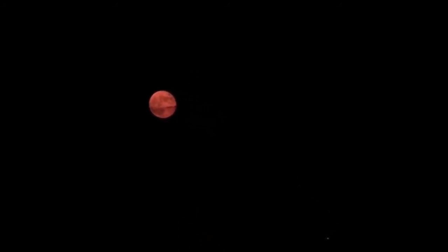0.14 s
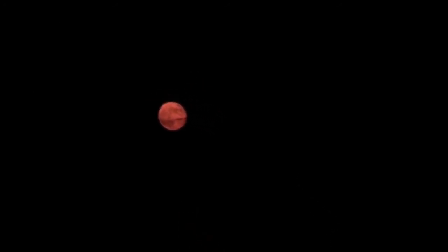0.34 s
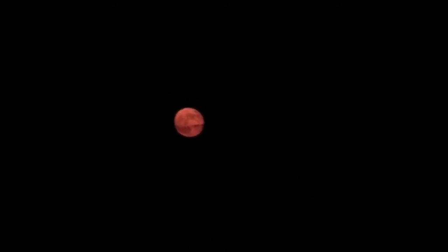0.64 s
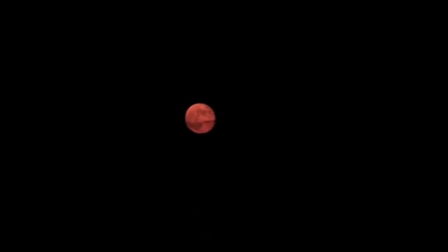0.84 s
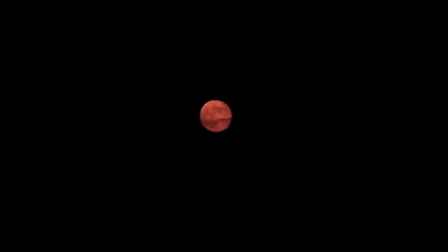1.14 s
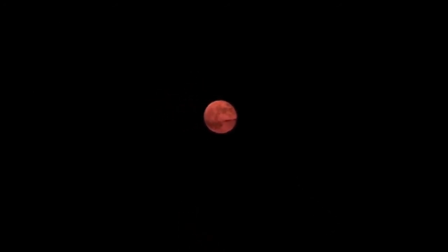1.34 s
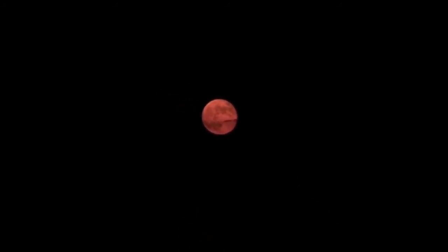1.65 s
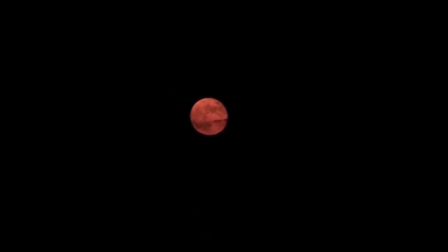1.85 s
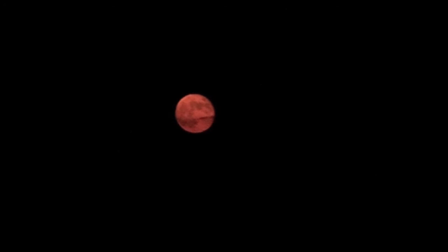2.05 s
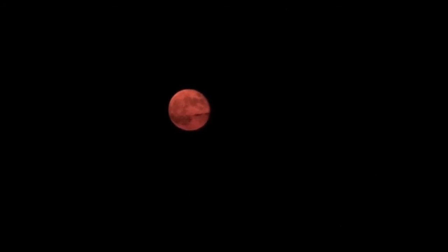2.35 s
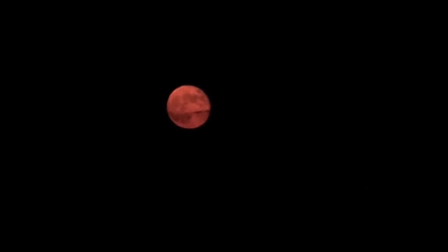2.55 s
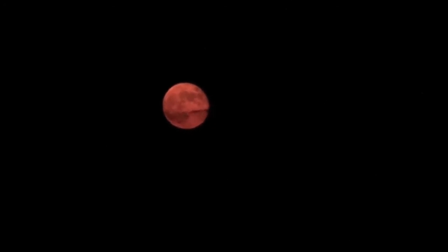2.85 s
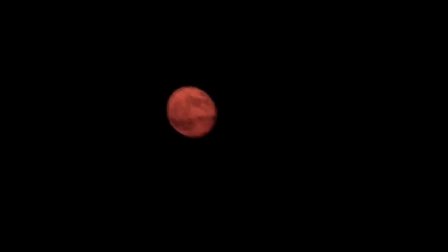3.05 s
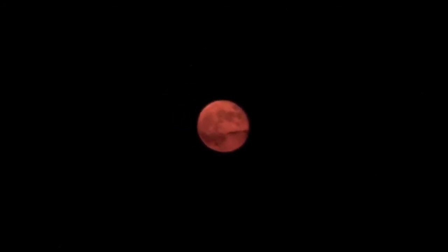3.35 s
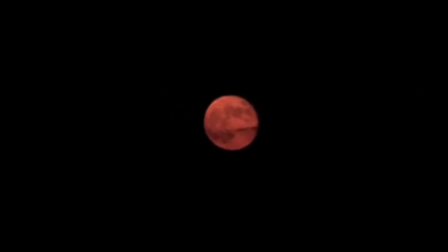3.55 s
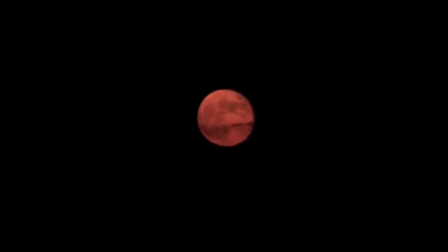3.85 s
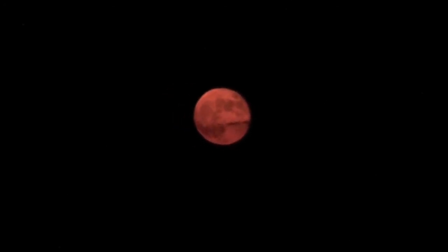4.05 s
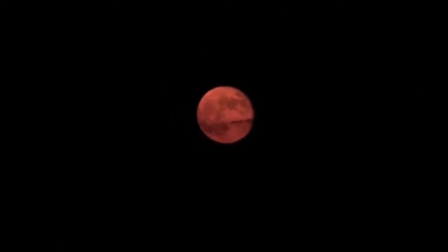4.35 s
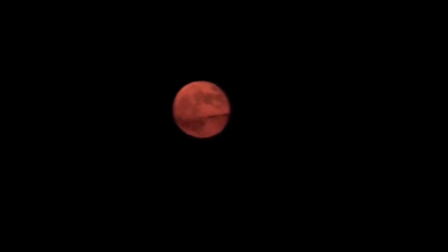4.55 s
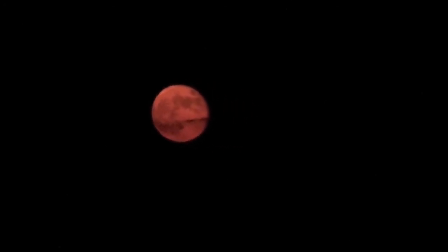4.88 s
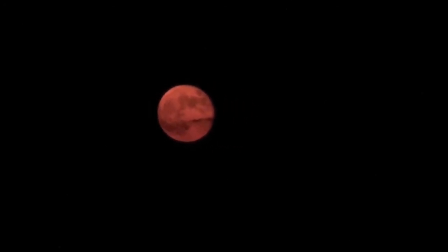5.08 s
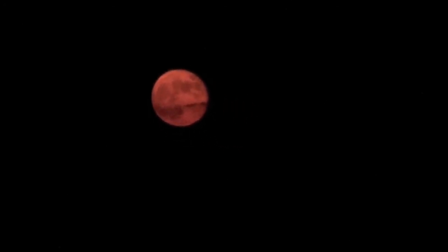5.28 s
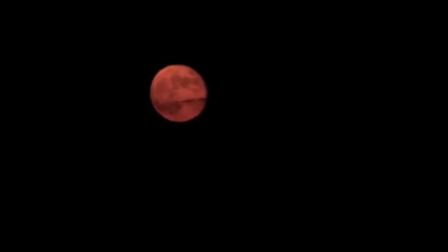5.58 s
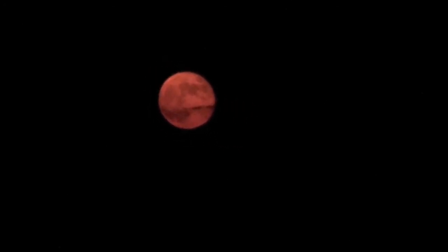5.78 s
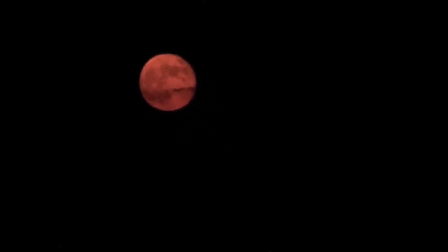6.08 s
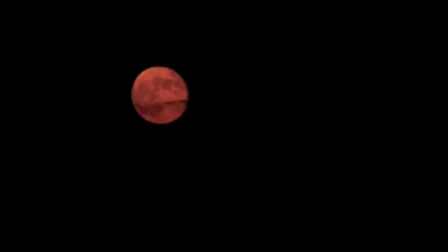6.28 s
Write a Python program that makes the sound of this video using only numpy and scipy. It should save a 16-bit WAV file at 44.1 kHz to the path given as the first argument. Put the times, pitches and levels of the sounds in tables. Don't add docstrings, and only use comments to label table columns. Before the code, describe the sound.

Outdoors on a quiet night, distant frogs trill in swelling bands over still water, with a nearer frog on the right giving quick runs of rising notes and occasional hoarse croaks ahead. A low distant engine hum wavers under soft air and hiss. Near the end, two much louder, dry plastic clicks snap right at the microphone.

```python
import sys
import numpy as np
from scipy import signal
from scipy.io import wavfile
from scipy.ndimage import uniform_filter1d

SR = 44100
rng = np.random.default_rng(int(sys.argv[2]) if len(sys.argv) > 2 else 0)


def voltage_ratio(level):
    return 10 ** (np.asarray(level, float) / 20)


def wrap_up_sound(samples):
    columns = np.atleast_2d(samples).T
    tamed = np.clip(columns, -1, 1)
    steps = np.round(tamed * 32767).astype(np.int16)
    wavfile.write(sys.argv[1], SR, steps)


N = 283122


def evened(x):
    return x / np.sqrt(np.mean(x ** 2) + 1e-20)


def read(points, hz):
    f, value = np.transpose(points)
    return np.interp(np.log(hz + 1), np.log(f + 1), value)


def columns(rows):
    s, *rest = np.transpose(rows)
    return [np.interp(np.arange(N) / SR, s, column) for column in rest]


def bumps(rows):
    t = np.arange(N) / SR
    return sum(high * np.cos(np.pi / 2 * np.clip((t - s) / half, -1, 1)) ** 2 for s, high, half in rows)


def drift(top_hz):
    t = np.arange(0, N / SR + .02, .005)
    slow = sum(np.sin(2 * np.pi * (f * t + rng.random())) for f in np.geomspace(top_hz / 20, top_hz, 20))
    return np.interp(np.arange(N) / SR, t, evened(slow))


def add(mix, s, sound):
    part = mix[..., max(round(s * SR), 0):][..., :sound.shape[-1]]
    part += sound[..., :part.shape[-1]]


def panned(x, db):
    return x * voltage_ratio(np.array([[db / 2], [-db / 2]]))


def highpass(x, order, hz):
    return signal.sosfilt(signal.butter(order, hz, "high", fs=SR, output="sos"), x)


def echoes(x, t60, onset):
    t = np.arange(SR // 3) / SR
    tail = rng.standard_normal((2, len(t))) * voltage_ratio(-60 * t / t60) * np.minimum(t / onset, 1)
    return signal.fftconvolve(x, tail / np.linalg.norm(tail[0]), axes=1)[:, :N]


def frogs():
    # (middle [s], rise [dB], half length [s])
    high_bouts = [(0, 7.5, 0.71), (1, 3.5, .4), (1.5, 2.2, 0.45), (2.25, 6.8, 0.58), (3.18, 9.5, 0.48),
                  (3.55, 5, 0.27), (4.62, 5.1, 0.45), (5.53, 9.4, 0.4), (6, 7.1, .45)]
    # (middle [s], rise [dB], half length [s])
    low_bouts = [(0, 5, 0.68), (.9, 4, 0.46), (1.43, 3.5, 0.58), (2.3, 3.5, 0.85), (2.92, 6, .4),
                 (3.68, 6, 0.42), (4.35, 3.5, 0.2), (4.7, 4.7, 0.5), (5.55, 5.1, 0.28), (6.24, 4.1, 0.55)]
    near, lone = caller(), croaks()
    calling = uniform_filter1d(1. * (near != 0), size=SR // 10)
    hush_db = -5 * np.minimum(calling * 2, 1)
    high_db = -58.5 + bumps(high_bouts) + hush_db - 4.0
    low_db = -62.5 + bumps(low_bouts) - 1.5
    high = voices(high_db, 1983, 155.4, 298, 0.0195, 30, 1.1, -23.5, count=30)
    low = voices(low_db, 1184.0, 75, 112, 0.019, 16, 4.7, -28, count=12)
    right = panned(high, -5.0) + panned(near, -5.5)
    ahead = panned(low, -0.65) + panned(lone, -1.0)
    return right + ahead + echoes(voltage_ratio(-8.5) * right + voltage_ratio(-20) * ahead, 0.13, 0.046)


def caller():
    # (first note [s], end [s], gap [s], peak level [dB], middle pitch [Hz])
    runs = [
        (.0365, .32, .0436, -48.5, 1895),
        (1.4565, 1.7, .0445, -50, 1880),
        (2.041, 2.31, .041, -54, 1950),
        (5.214, 5.45, .0428, -47.5, 1930),
    ]
    warm_up_db, warm_up_s = 3, .05
    uneven_db, uneven_hz = .7, 15
    near = np.zeros(N)
    for first, end, gap, db, hz in runs:
        chance = rng.standard_normal((12, 2))
        for s, (loud, high) in zip(np.arange(first, end, gap), chance):
            middle = hz + uneven_hz * high
            note_db = db + 3 - warm_up_db * np.exp((first - s) / warm_up_s) + uneven_db * loud
            add(near, s - .008, voltage_ratio(note_db) * chirp(middle - 230, middle + 300, .024, -22))
    return near


def chirp(from_hz, to_hz, length, overtone_db=-60):
    hz = np.linspace(from_hz, to_hz, max(round(length * SR), 8))
    turn = 2 * np.pi * np.cumsum(hz) / SR
    return (np.sin(turn) + voltage_ratio(overtone_db) * np.sin(2 * turn)) * np.hanning(len(hz))


def voices(level_db, hz, spread_hz, glide_hz, length, per_s, uneven_db, overtone_db, count):
    out = np.zeros(N)
    for pitch, (pace, start) in zip(np.linspace(-1, 1, count), rng.uniform(-1, 1, (count, 2))):
        cycles = np.arange(N) * per_s * (1 + .15 * pace) / SR + start
        beats = np.flatnonzero(np.diff(np.floor(cycles)))
        middle = hz + spread_hz * pitch
        note = chirp(middle - glide_hz / 2, middle + glide_hz / 2, length, overtone_db)
        for at, db in zip(beats, uneven_db * drift(2.7)[beats]):
            add(out, at / SR, voltage_ratio(db) * note)
    slow = np.sqrt(uniform_filter1d(out ** 2, size=SR // 4) + 1e-12)
    return voltage_ratio(level_db) * out / slow


def croaks():
    # (time [s], peak level [dB], top pitch [Hz], length [s])
    arches = [
        (1.82, -48, 977, 0.146),
        (3.076, -52, 916, 0.119),
        (3.527, -53.5, 1006, 0.16),
    ]
    # (time [s], peak level [dB], start pitch [Hz], end pitch [Hz], length [s])
    slides = [
        (.101, -49.5, 787, 940, 0.085),
        (0.191, -49, 1013, 1150, .06),
        (1.374, -52, 763, 1003, 0.15),
        (3.269, -60, 922, 1130, 0.23),
        (3.432, -51, 1230, 1190, 0.039),
        (4.447, -51, 945, 1065, 0.104),
        (4.54, -51, 1245, 1140, 0.056),
    ]
    out = np.zeros(N)
    for s, db, hz, length in arches:
        add(out, s, voltage_ratio(db) * croak(.82 * hz, hz, .82 * hz, length))
    for s, db, from_hz, to_hz, length in slides:
        add(out, s, voltage_ratio(db) * croak(from_hz, (from_hz + to_hz) / 2, to_hz, length))
    return out


def croak(start_hz, top_hz, end_hz, length):
    u = np.linspace(0, 1, round(length * SR))
    hz = np.polyval(np.polyfit([0, .5, 1], [start_hz, top_hz, end_hz], 2), u)
    shaky = evened(uniform_filter1d(rng.standard_normal(SR // 4), size=250))[:len(u)]
    throb = 1 - 0.37 * (1 + np.cos(2 * np.pi * 27 * length * u))
    return np.sin(2 * np.pi * np.cumsum(hz + 55 * shaky) / SR) * throb * signal.windows.tukey(len(u), .4)


def control():
    # (time [s], peak level [dB])
    press_blows = [
        (5.5066, -11.5),
        (5.5080, -46),
    ]
    # (frequency [Hz], level [dB], t60 [s])
    press_modes = [(600, -10, 0.075), (1050, 2, 0.032), (1690, 2, 0.021), (3120, 13, 0.006),
                   (3900, -7.5, 0.028), (4150, 6.5, 0.0097), (5800, -11, 0.014), (7200, -5.5, 0.0086),
                   (9500, -2, 0.0063), (11900, -13, 0.0048)]
    # (time [s], peak level [dB])
    release_blows = [
        (5.6038, -16),
        (5.6053, -7),
        (5.6085, -26),
        (5.6140, -32),
        (5.6210, -36),
    ]
    # (frequency [Hz], level [dB], t60 [s])
    release_modes = [(1103, -14, 0.058), (1647, -16, 0.09), (1700, -7, 0.023), (2000, -14, 0.05),
                     (2070, -8, 0.017), (2470, -21.5, 0.068), (2520, -14, .017), (3140, -5, .015),
                     (3814, 1.5, 0.0099), (4100, -20, 0.014), (5170, -10.5, 0.013), (6050, -11, 0.01)]
    press = press_blows, press_modes, -8, 300
    release = release_blows, release_modes, -5, 950
    out = np.zeros((2, N))
    for blows, modes, bright_db, low_hz in (press, release):
        for s, db in blows:
            body = highpass(ring(modes, bright_db), 5, low_hz)
            add(out, s, panned(voltage_ratio(db) * body, -0.8))
    add_creaks(out)
    out = highpass(out, 4, 480)
    dull = signal.sosfilt(signal.butter(2, [1200, 3300], "band", fs=SR, output="sos"), out)
    near = voltage_ratio(-16) * echoes(out, .03, .002)
    return out + near + voltage_ratio(-30) * echoes(dull, 0.12, 0.0087)


def add_creaks(out):
    # (time [s], peak level [dB], ring [Hz], left minus right [dB], small modes [dB])
    creaks = [(2.816, -38.5, 5200, 1, -3), (3.809, -35, 1570, 1, -13), (4.635, -42.5, 1300, 1, -1),
              (5.4938, -29, 1740, 4, 2), (5.542, -39, 1900, -2, -5), (5.568, -35, 1290, -1.5, -11),
              (5.578, -27.5, 1700, 1, -9), (5.5888, -27, 1400, 2, -8), (5.593, -31, 1700, -1, -12),
              (5.597, -37, 1840, 4, -3), (5.598, -24, 1980, 4, -4)]
    # (time [s], peak level [dB], lowest frequency [Hz])
    ticks = [
        (2.408, -46, 6000),
        (2.67, -48, 8000),
        (3.809, -44, 5300),
    ]
    for s, db, hz, pan_db, bright_db in creaks:
        soft = signal.lfilter(*signal.butter(2, 11000, fs=SR), ring([(hz, 0, .018)], bright_db))
        add(out, s, panned(voltage_ratio(db) * soft, pan_db))
    for s, db, hz in ticks:
        thin = highpass(ring([]), 4, hz)
        add(out, s, voltage_ratio(db) * thin / abs(thin).max())


def ring(modes, bright_db=0.5):
    # (frequency [Hz], level [dB])
    casing = [(900, -8), (1300, -5.5), (3000, -3.5), (4500, -11.5), (6000, -18), (9000, -17),
              (15000, -21.5)]
    # (frequency [Hz], t60 [s])
    casing_t60 = [(700, 0.042), (2500, 0.015), (6000, 0.014), (15000, 0.0074)]
    t = np.arange(SR // 12) / SR
    place, sign = rng.uniform(-0.84, 1, (2, 70))
    hz = np.linspace(950, 15000, 70) + 100 * place
    crowd = zip(hz, read(casing, hz) + bright_db, read(casing_t60, hz), sign)
    x = sum(voltage_ratio(db - 60 * t / t60) * np.cos(2 * np.pi * f * t) for f, db, t60 in modes)
    x += sum(voltage_ratio(db - 60 * t / t60) * np.cos(2 * np.pi * f * t + np.pi * p) for f, db, t60, p in crowd)
    x *= 1 - np.exp(-t / .0003)
    return x / abs(x).max()


def engine():
    # (time [s], pitch [Hz], level [dB])
    hum = [(0, 202.5, -52), (.45, 198.5, -44), (.65, 196, -45.5), (1.1, 194.4, -47.5), (2.1, 194.4, -46.5),
           (2.5, 197.5, -44), (2.95, 195.9, -45), (4.6, 195.6, -43.5), (4.88, 192.9, -47), (5.2, 193, -43),
           (5.5, 191.5, -43), (6.1, 190.4, -49), (6.42, 190.8, -48)]
    # (middle [s], depth [dB], half length [s])
    fades = [(.07, 12, 0.033), (.19, 5, .07), (.36, 10.5, 0.17), (.6, 14, 0.14), (.8, 6, .05),
             (.98, 5, .05), (1.09, 18, .025), (1.28, 8, 0.09), (1.71, 4.5, .17), (2.06, 8.5, 0.11),
             (2.27, 3, .05), (2.41, 4.5, 0.084), (2.65, 4.5, 0.2), (3, 4, 0.26), (3.41, 3.5, 0.073),
             (3.66, 6, 0.17), (4.12, 3.5, 0.14), (4.55, 2, 0.068), (4.85, 4, 0.091), (4.98, 3, 0.1),
             (5.6, 5, 0.12), (5.87, 2.5, 0.14), (6.05, 5, 0.063), (6.35, 8, .05)]
    # (multiple of the strongest [-], resting level [dB rms], middle [s], rise [dB], half length [s])
    orders_upper = [(3, -69, 5.6, 8, 6.8), (3.5, -66.5, 3.74, 8, 0.77)]
    # (multiple of the strongest [-], level [dB rms])
    orders_weak = [(.5, -74.5), (1.25, -67), (1.5, -67), (2, -68), (2.5, -69), (5, -72)]
    hz, main_db = columns(hum)
    turn = 2 * np.pi * np.cumsum(hz) / SR
    out = voltage_ratio(main_db - bumps(fades)) * np.sin(turn)
    upper = [(order, db + bumps([rise])) for order, db, *rise in orders_upper]
    for order, db in upper + list(orders_weak):
        out += voltage_ratio(db + 1.23 * drift(5)) * np.sin(order * turn + 0.61 * drift(5))
    return np.sqrt(2) * out


def air():
    # (frequency [Hz], density [dB per Hz])
    air_spectrum = [(15, -57), (30, -44), (60, -2.5), (95, -16.5), (200, -17.5), (640, -21.5), (1100, -22),
                    (1560, -27), (2400, -26), (2900, -33.5), (3600, -28.5), (4300, -34), (5300, -33.5),
                    (10400, -38.5), (16000, -42.5)]
    # (frequency [Hz], side minus mid [dB])
    air_side = [(60, -34), (170, -38), (300, -13.5), (700, -9), (1500, -8.5), (3000, -10), (6000, -17.5),
                (15000, -20)]
    frames, hz = N // 256 + 5, np.fft.rfftfreq(1024, 1 / SR)
    a, b, c, d, patches = rng.standard_normal((frames, 513, 5)).T
    patches = uniform_filter1d(patches, size=10, axis=0)
    patches = evened(uniform_filter1d(patches, size=14, axis=1))
    mid = a + 1j * b
    side = voltage_ratio(read(air_side, hz))[:, None] * (c + 1j * d)
    z = np.array([mid + side, mid - side]) * voltage_ratio(read(air_spectrum, hz)[:, None] + 1.0 * patches)
    return voltage_ratio(-50.5) * evened(signal.istft(z, nperseg=1024, noverlap=768)[1][:, :N])


def circuits():
    # (frequency [Hz], level [dB rms])
    whines = [(3357, -86), (5095, -87), (6833, -89), (8452, -87), (8511, -85), (10190, -91), (15734, -89)]
    t = np.arange(N) / SR
    return sum(np.sqrt(2) * voltage_ratio(db) * np.sin(2 * np.pi * hz * t) for hz, db in whines)


def scene():
    return frogs() + control() + engine() + air() + circuits()


def roll_off(x):
    return signal.sosfilt(signal.butter(12, 16300, fs=SR, output="sos"), x)


def record(dry):
    edge = signal.firwin(801, 15760, window=("kaiser", 9), fs=SR)
    x = highpass(dry, 2, 40)
    return roll_off(signal.oaconvolve(x, edge[None], "same"))


dry = scene()
out = record(dry)
wrap_up_sound(out)
```